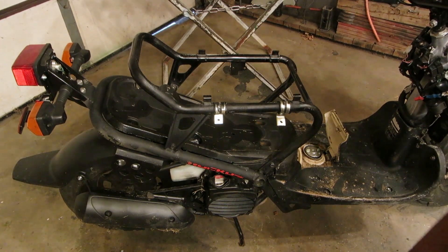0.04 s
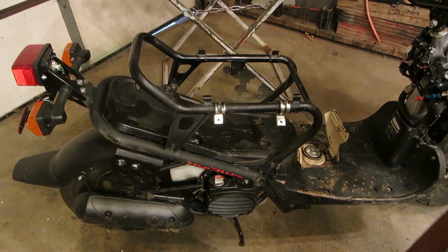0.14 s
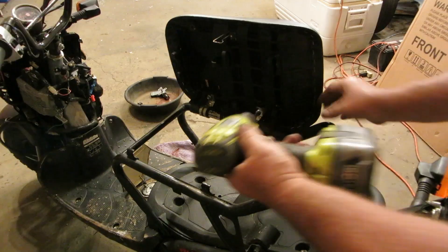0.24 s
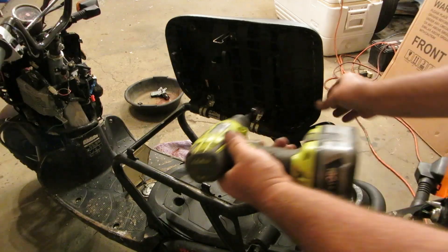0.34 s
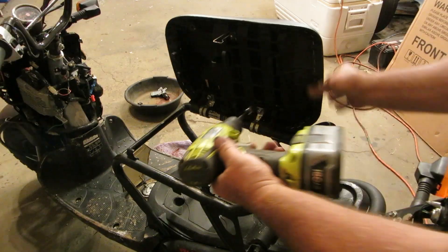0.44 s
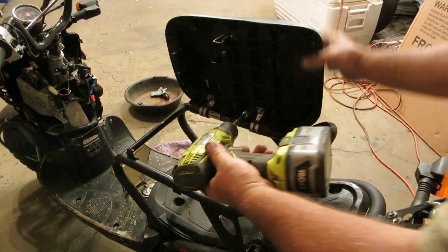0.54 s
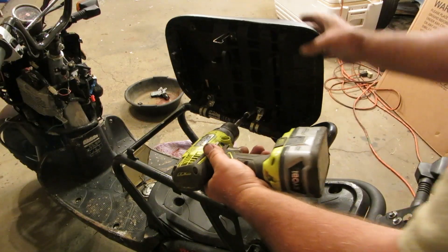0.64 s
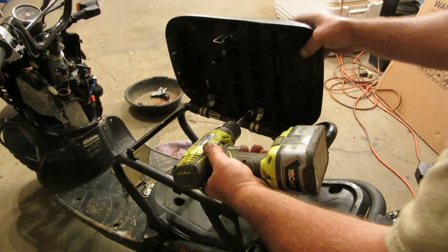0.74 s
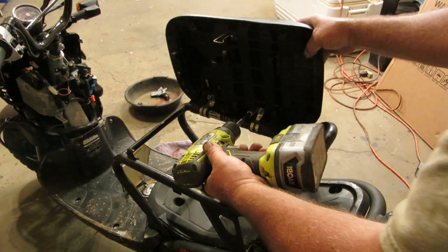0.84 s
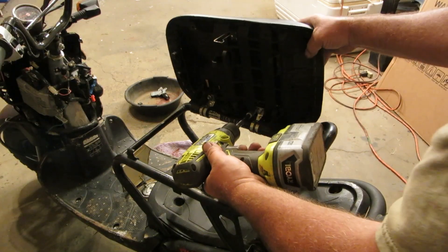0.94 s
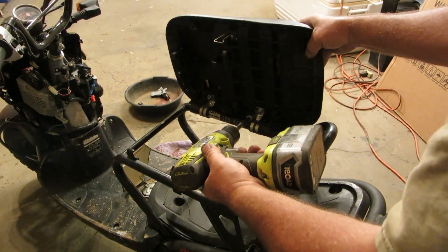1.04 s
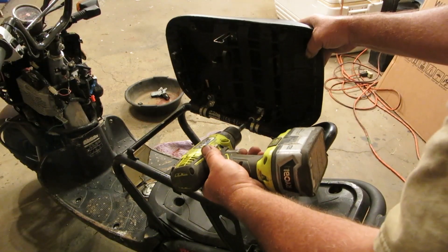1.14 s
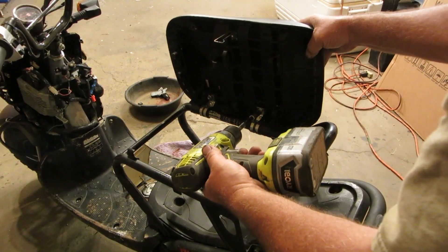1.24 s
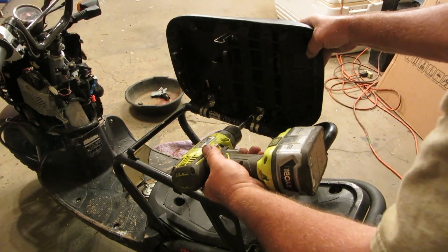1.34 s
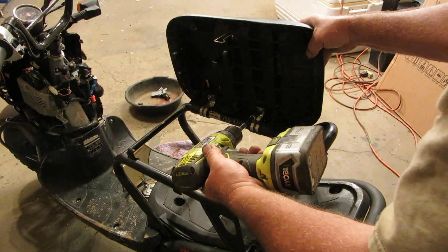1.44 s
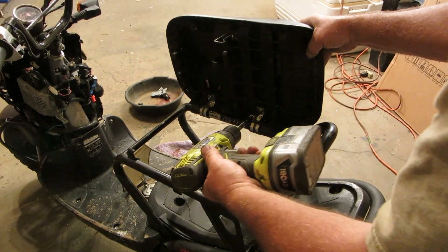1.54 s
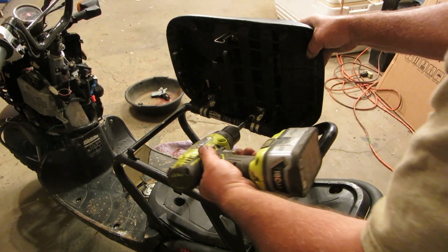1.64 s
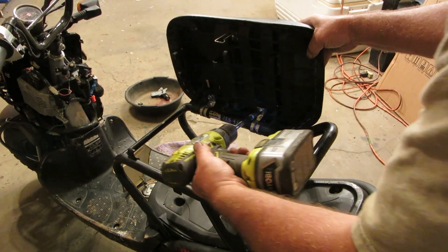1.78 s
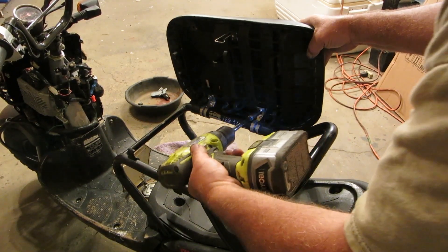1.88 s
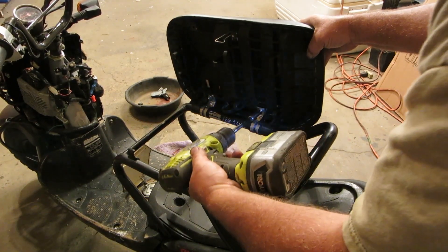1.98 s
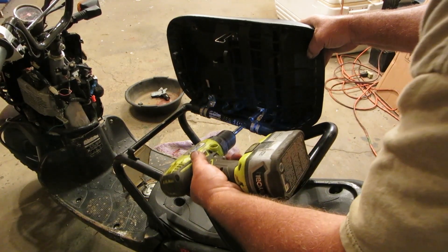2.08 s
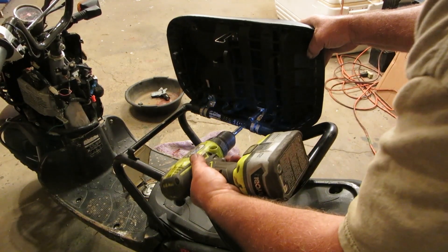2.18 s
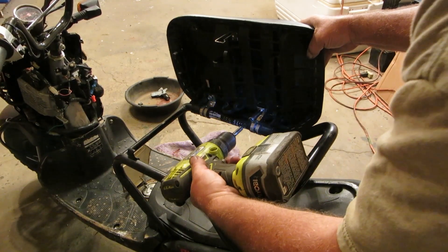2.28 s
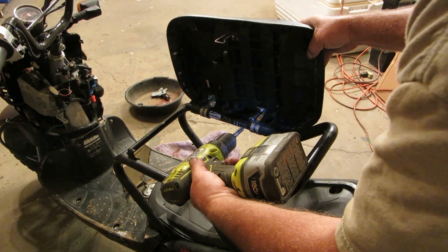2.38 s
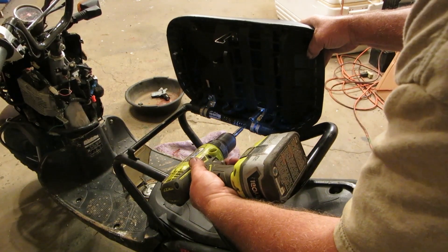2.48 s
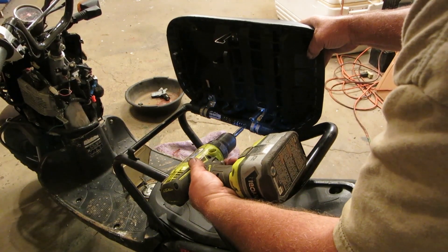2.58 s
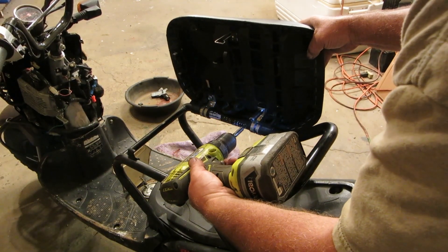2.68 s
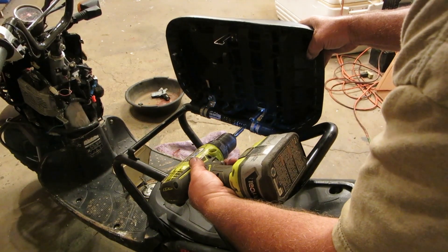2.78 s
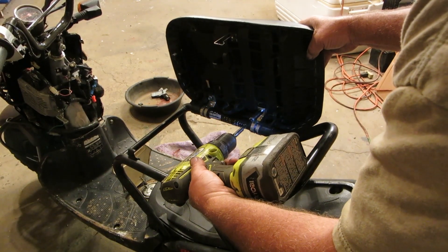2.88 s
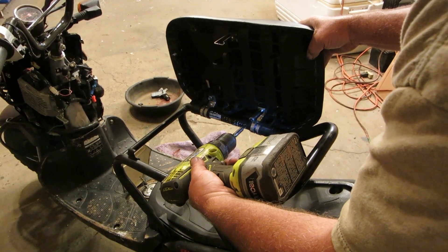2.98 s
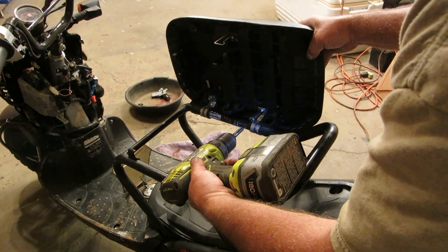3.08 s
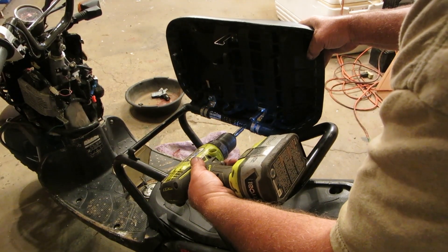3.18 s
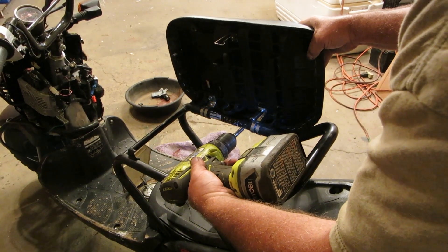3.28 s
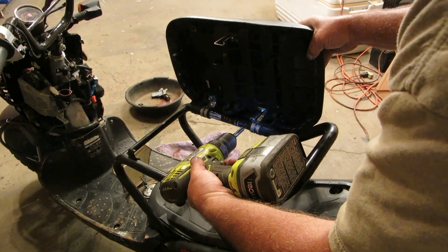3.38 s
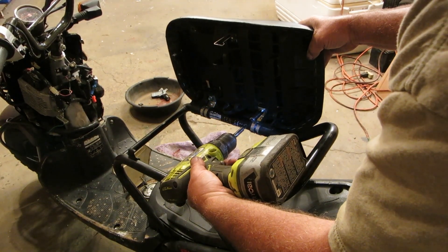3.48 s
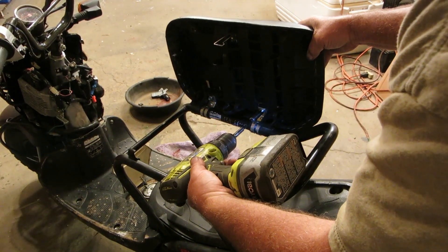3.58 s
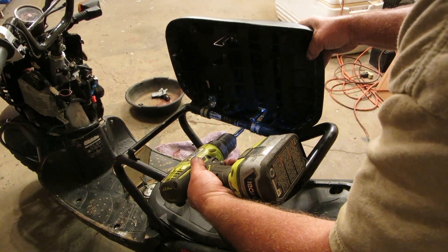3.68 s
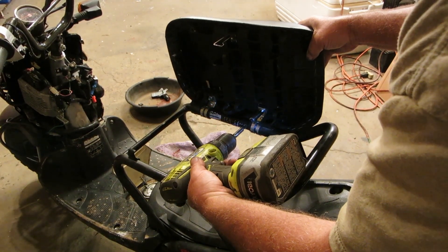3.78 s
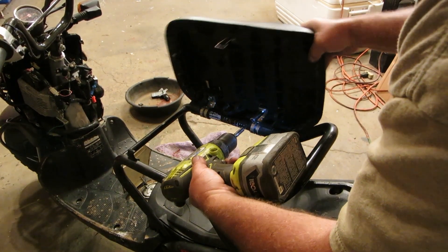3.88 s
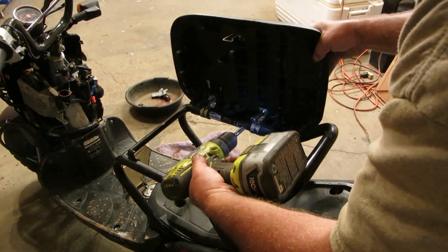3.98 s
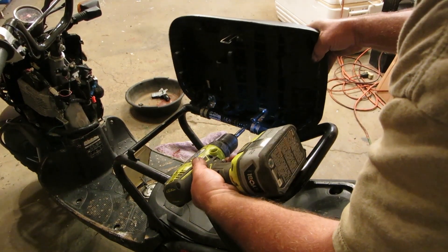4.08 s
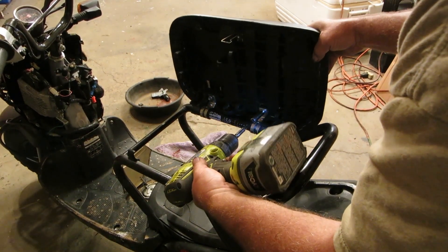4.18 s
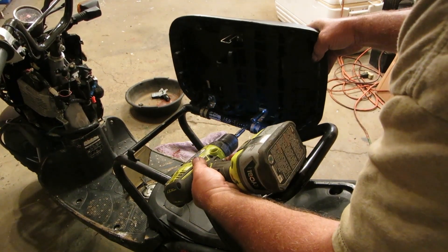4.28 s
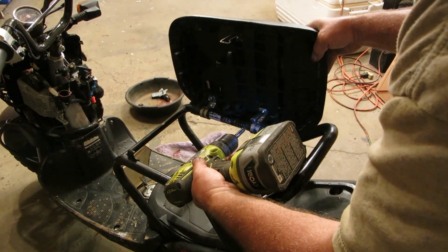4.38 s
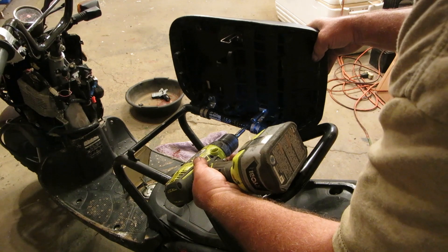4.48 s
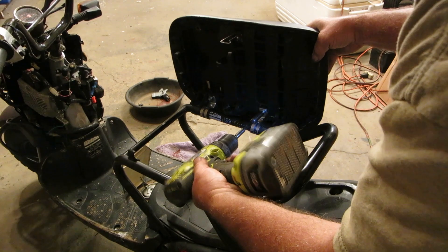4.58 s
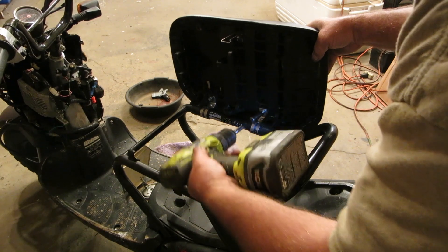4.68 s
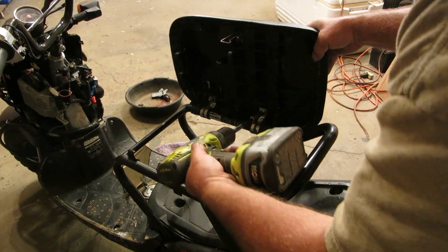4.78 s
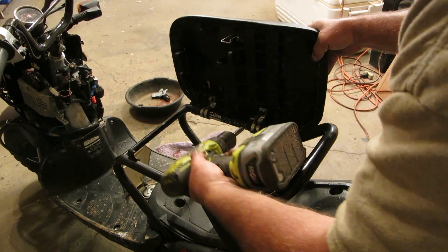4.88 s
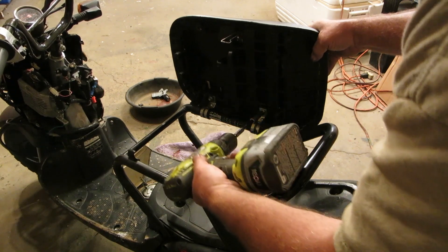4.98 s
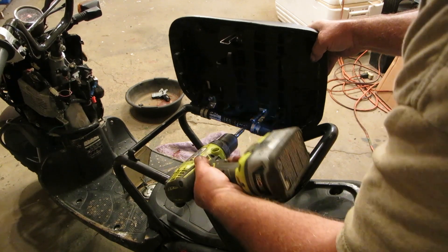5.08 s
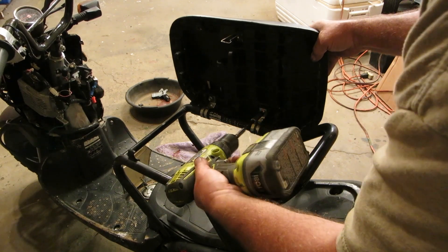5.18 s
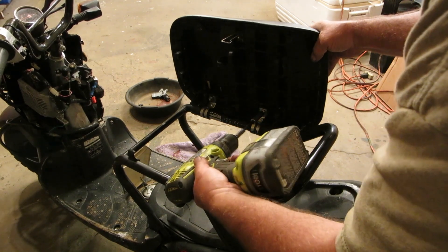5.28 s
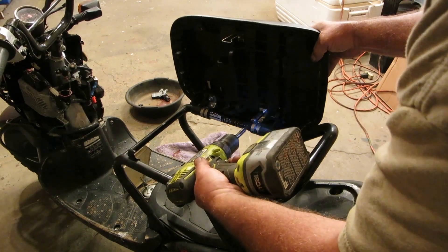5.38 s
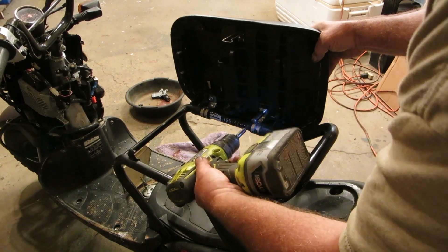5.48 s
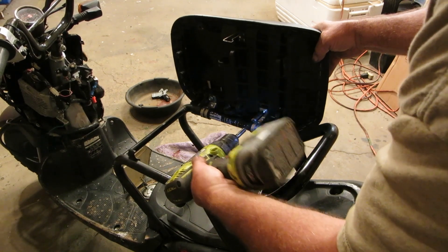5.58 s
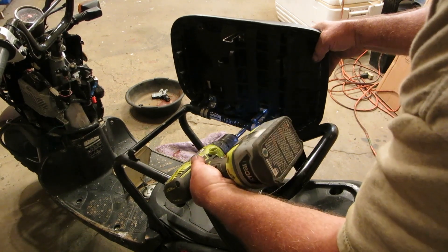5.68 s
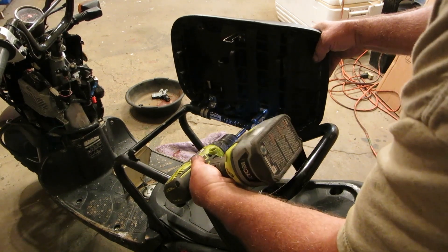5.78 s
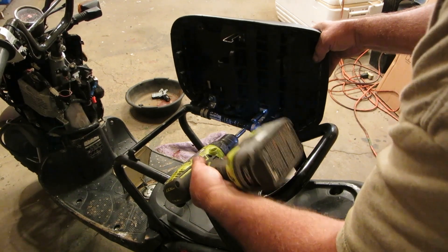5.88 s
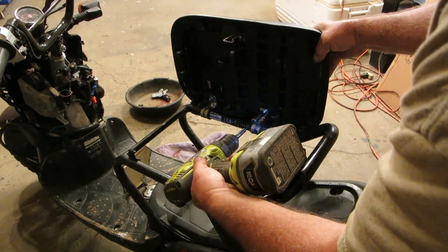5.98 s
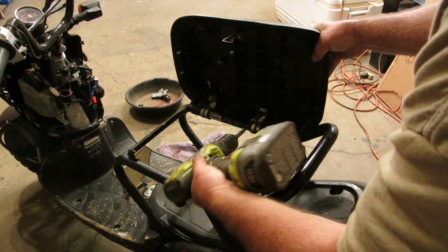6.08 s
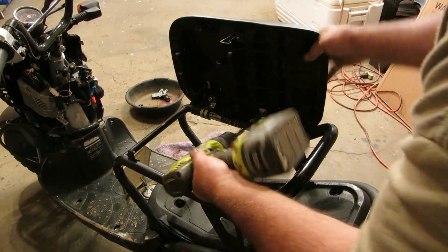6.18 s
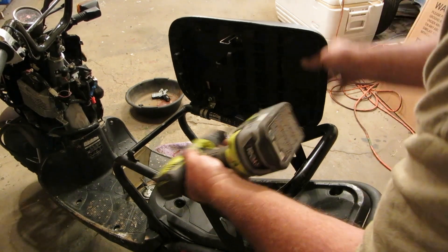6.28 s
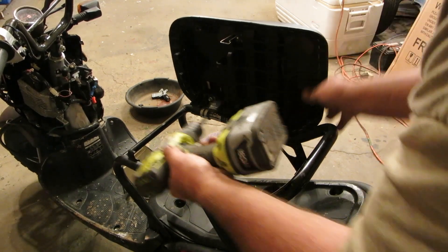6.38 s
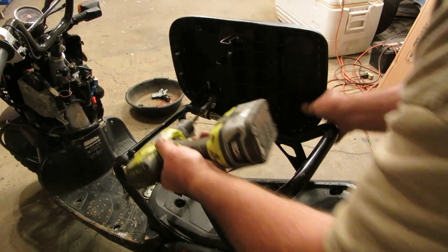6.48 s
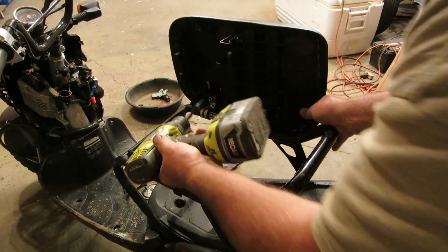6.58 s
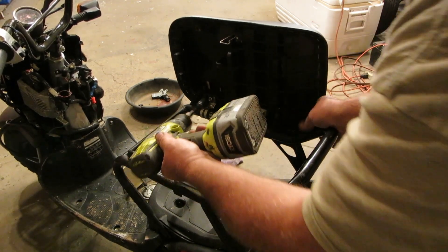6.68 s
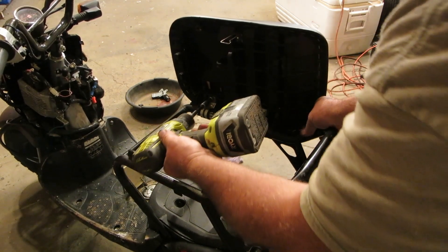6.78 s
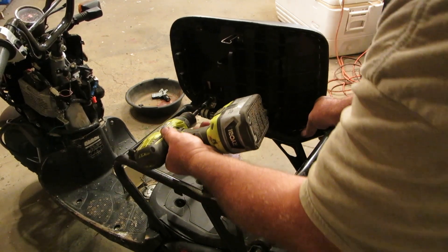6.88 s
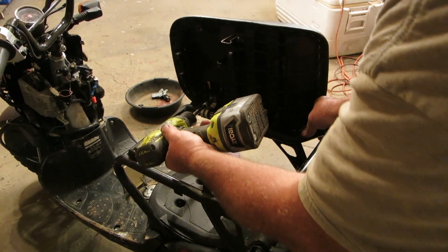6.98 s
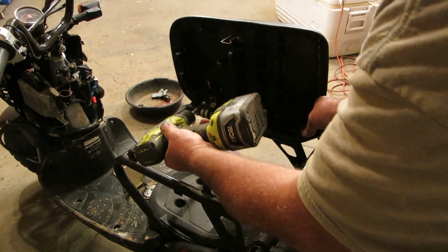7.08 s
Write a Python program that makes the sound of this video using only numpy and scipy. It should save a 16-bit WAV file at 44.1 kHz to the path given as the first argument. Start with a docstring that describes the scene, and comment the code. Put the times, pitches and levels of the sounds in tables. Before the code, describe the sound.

A cordless drill whines steadily and grinds slowly against a bolt, then slips in clattering bursts with hard metallic knocks in an echoing garage.

```python
"""A cordless drill-driver turns bolts slowly into a scooter's seat bracket in a garage.
Its half-pressed trigger makes steady tones whine; gears and bit grind as many tiny random impacts.
The bit catches and slips in clattering bursts, and every knock rings the seat pan and steel frame.
Later, hands brush the seat as filtered grains; fading random echoes make the garage, over quiet noise.
Near the start the sound cuts out briefly and returns with two pops and a fading room tail."""
import sys
import numpy as np
from scipy import signal
from scipy.fft import rfft, irfft
from scipy.io import wavfile

SR = 44100
rng = np.random.default_rng(int(sys.argv[2]) if len(sys.argv) > 2 else 0)


def log_audio(samples):
    """Write samples as a 16-bit WAV file to the path given in sys.argv[1]."""
    # one column per channel
    frames = np.atleast_2d(samples).T
    # limit to full scale, then quantise
    limited = np.clip(frames, -1, 1)
    pcm = np.round(limited * 32767).astype(np.int16)
    wavfile.write(sys.argv[1], SR, pcm)


N = 314874
TIME = np.arange(N) / SR

# The bit slips and churns in the bolt head, levels before the final balance:
# start_s, hold_s, gear_noise_db, bright_scrape_db
SLIPS = [(3.92, 0.12, -35.5, -37.5), (4.1, 0.07, -49, -45.5), (4.635, 0.057, -34, -48),
         (4.8, 0.085, -31, -35), (5.15, .07, -27, -32), (5.263, 0.022, -34, -53), (5.3, 0.059, -40, -56),
         (5.485, 0.088, -37.5, -41.5), (5.775, 0.023, -45.5, -46), (6.112, 0.066, -41.5, -43)]
SLIP_ATTACK_S, SLIP_RELEASE_S = 0.017, 0.024
# Broad tone of clattering metal, also of dull soft noise: pitch_hz, relative level_db (per Hz)
CLATTER_TONE = [(150, -20.5), (450, -4), (700, -0.5), (1200, -0.5), (2000, 1), (2800, -4), (4000, -21.5),
                (8000, -26)]
# Soft noises; the first row is a fading room tail, heard as the sound returns, the later rows are
# hands brushing the seat: start_s, hold_s, attack_s, relative bright_db, relative dull_db
SOFT_NOISES = [(0.227, .04, 0.0036, -56.5, -53), (6.36, 0.16, .05, -49.5, -71),
               (6.854, .005, 0.0065, -76, -47)]


def amp(db):
    """Turns decibels into a gain."""
    return 10 ** (np.asarray(db) / 20)


def unit(x):
    """Scales a sound to an average strength (rms) of 1."""
    return x / np.sqrt(np.mean(x ** 2) + 1e-20)


def read(points, hz):
    """Reads a table of (pitch_hz, value) in between its points, on a log pitch axis."""
    table_hz, value = np.transpose(points)
    return np.interp(np.log(hz + 1), np.log(table_hz + 1), value)


def add(mix, start_s, sound):
    """Mixes a sound in at a given time."""
    part = mix[round(start_s * SR):][:len(sound)]
    part += sound[:len(part)]


def drift(hz):
    """Slow random wander of rms 1: noise with everything much faster than hz removed."""
    spectrum = rfft(rng.standard_normal(N))
    slowness = 1 + (np.fft.rfftfreq(N, 1 / SR) / hz) ** 4
    return unit(irfft(spectrum / slowness, N))


def colour(x, points, modes=()):
    """Filter of energy 1 that never sounds early: a broad spectrum with resonances on top."""
    hz = np.fft.rfftfreq(4096, 1 / SR)
    peaks = sum(db / (1 + (2 * (hz - peak_hz) / width_hz) ** 2) for peak_hz, width_hz, db in modes)
    level_db = read(points, hz) + peaks
    log_gain = np.log(amp(np.r_[level_db, level_db[-2:0:-1]]))
    # this phase puts the filter's energy as early as possible
    taps = np.fft.ifft(np.exp(np.conj(signal.hilbert(log_gain)))).real
    return signal.oaconvolve(x, taps / np.linalg.norm(taps))[:len(x)]


def grains(per_s, spread_db):
    """A random train of tiny impacts of uneven size, scaled to rms 1."""
    size = amp(spread_db * np.minimum(rng.exponential(1, N), 4))
    direction = rng.choice([-1, 1], N)
    hits = rng.random(N) < per_s / SR
    return unit(size * direction * hits)


def ring(x, hz, width_hz):
    """One resonance, scaled to pass white noise at its own power."""
    radius = np.exp(-np.pi * width_hz / SR)
    spin = radius * np.exp(2j * np.pi * hz / SR)
    return np.sqrt(2 * (1 - radius * radius)) * signal.lfilter([1], [1, -spin], x).imag


def swell(start_s, hold_s, attack_s, release_s):
    """Gain that grows up to the start, holds, then dies away (exponential time constants)."""
    growth = np.minimum(TIME - start_s, 0) / attack_s
    decay = np.maximum(TIME - start_s - hold_s, 0) / release_s
    return np.exp(growth - decay)


def glide(rows, waver):
    """Phase and gain of a slightly unsteady tone that follows a curve of pitch and level."""
    s, hz, db = np.transpose(rows)
    pitch = np.interp(TIME, s, hz) * (1 + waver * drift(130))
    phase = 2 * np.pi * np.cumsum(pitch) / SR
    sounding = (TIME > s[0]) * (TIME < s[-1])
    return phase, amp(np.interp(TIME, s, db)) * sounding


def soft_noise(rows, release_s=0.038):
    """Bright and dull noise from many tiny impacts, each row swelling and fading once."""
    # tone of the bright part: pitch_hz, relative level_db (per Hz)
    bright_tone = [(300, -42), (800, 4), (1750, -1), (3000, 4), (5500, 5.5), (9500, 1.5), (15000, -6)]
    bright = colour(grains(7100, 1.4), bright_tone)
    dull = colour(grains(3000, 0.97), CLATTER_TONE)
    out = np.zeros(N)
    for start, hold, attack, bright_db, dull_db in rows:
        out += swell(start, hold, attack, release_s) * (amp(bright_db) * bright + amp(dull_db) * dull)
    return out


def floor(air_db=-47):
    """Still garage air as shaped noise, with faint steady electrical tones."""
    # spectrum of the air: pitch_hz, relative level_db (per Hz)
    air_tone = [(12, -50), (20, -2), (81, -3), (146, -2.5), (210, -5), (340, -4), (513, -4.5), (1220, -3),
                (1600, -8), (3530, -13.5), (8180, -21), (13500, -28), (16000, -49)]
    # how alike left and right are: pitch_hz, correlation (-1 to 1)
    likeness = [(30, -0.28), (70, -0.14), (150, -0.71), (400, -0.83), (1500, -0.81), (5000, -0.65),
                (14000, 1)]
    # electrical tones: pitch_hz, level_db (rms)
    hum = [(1147, -73.5), (1723, -77.5), (15735, -72.5)]
    hz = np.fft.rfftfreq(N, 1 / SR)
    left, other = rfft(rng.standard_normal((2, N)))
    same = np.clip(read(likeness, hz), -1, 1)
    right = same * left + np.sqrt(1 - same ** 2) * other
    air = irfft(np.array([left, right]) * amp(read(air_tone, hz)), N)
    tones = sum(amp(db) * np.sqrt(2) * np.sin(2 * np.pi * f * TIME) for f, db in hum)
    return amp(air_db) * unit(air) + tones


def room_tail():
    """A fading room tail, heard as the sound returns, made of soft noise."""
    return soft_noise(SOFT_NOISES[:1])


def garage(x, width=0.41, onset_s=0.00057):
    """Dense reflections die away band by band, with nearly the same tail left and right."""
    # time to fade by 60 dB: pitch_hz, fade_s
    fade_times = [(150, 1), (500, 0.49), (1400, 0.48), (3700, 0.5), (8000, 0.45), (15000, 0.37)]
    echoes = rng.standard_normal((2, SR)) * (rng.random((2, SR)) < .12)
    hz, t, bands = signal.stft(echoes, SR, nperseg=256)
    fade = amp(-60 * t / read(fade_times, hz)[:, None])
    bands = bands * fade * (1 - np.exp(-t / onset_s))
    tails = signal.istft(bands, SR, nperseg=256)[1]
    mid, side = signal.fftconvolve(x[None], tails / np.linalg.norm(tails[0]), axes=1)[:, :N]
    return np.array([mid + width * side, mid - width * side])


def whistles():
    """A thin two-toned squeal as the drill is brought up, then its faint gliding whistle."""
    # both tables: time_s, pitch_hz, relative level_db
    squeal_curve = [(.27, 9600, -73), (.39, 9200, -72), (.46, 8400, -67), (.58, 8700, -66),
                    (.77, 7600, -74)]
    whistle_curve = [(1.83, 7320, -56), (1.95, 7310, -58), (2.2, 7470, -55), (2.55, 7300, -56),
                     (2.78, 7210, -51), (3.5, 7060, -64)]
    phase, gain = glide(whistle_curve, 0.0018)
    whistle = gain * np.sin(phase) * amp(5.1 * drift(25))
    phase, gain = glide(squeal_curve, .004)
    squeal = gain * (np.sin(phase) + np.sin(1.087 * phase))
    return np.sqrt(2) * (whistle + squeal)


def knocks(blows, clatter_t60=0.09, tick_t60=0.039, thud_t60=0.16, thud_db=-1, thump_db=-2,
           clatter_db=1, tick_db=2, ring_db=6, ring_share=0.41):
    """Each blow is a hard crack, a dense ring of the frame and a slower boom; returns (bright part, boom)."""
    # seat pan modes: pitch_hz, relative level_db, time to fade by 60 dB fade_s
    pan = [(143, -17, .35), (205, -14, .2), (228, -4, .28), (275, -15, .15), (335, -6, .2), (380, -8, .13),
           (430, -3, .15), (452, 0, .17), (480, -4, .14), (670, -11, .12), (740, -8, .13), (810, -8, .13)]
    # steel frame resonances: pitch_hz, width_hz, boost_db
    frame_modes = [(690, 150, -1.5), (984, 21, 3), (1190, 220, 1), (1346, 130, 2.5), (1680, 47, 0.5),
                   (2210, 100, 1.5), (2770, 90, -9), (3700, 160, 8)]
    # tones of thud (the pan's many damped modes), tick and crack: pitch_hz, relative level_db (per Hz)
    thud_tone = [(90, -42), (145, -12), (175, -13), (228, 0), (275, -7), (340, -2), (450, -1), (600, -8),
                 (780, -2), (1050, -4), (1500, -20), (3000, -50)]
    tick_tone = [(1200, -18.5), (2600, 1), (3600, 2.5), (5000, -0.5), (7000, -4.5), (9000, -12),
                 (12000, -18), (16000, -43)]
    crack_tone = [(100, -25.5), (500, 1), (1500, 9), (4000, -0.5), (7500, -5), (10000, -12.5), (16000, -76)]
    # hard, bright blows crack more sharply: base dB, dB per dB of strength, dB per dB of brightness
    crack_db, crack_growth, crack_bright_share = 20.5, 1.65, .35
    t = np.arange(SR // 2) / SR
    crack, thump, clatter, tick = np.zeros((4, N))
    hz, mode_db, t60 = np.array(pan).T[:, :, None]
    for start, strength, boom, bright, ring_hz in blows:
        noise = rng.standard_normal((4, len(t)))
        where = rng.standard_normal((2, len(pan), 1))
        # the place of the blow weights the modes and favours those near its main ring
        near = 8 / (1 + (4 * (hz / ring_hz - 1)) ** 2)
        weight = amp(mode_db + 1.5 * where[0] + near)
        phase = 2 * np.pi * hz * (1 + 0.0084 * where[1]) * t + np.pi * (where[1] > 0)
        modes = (weight * amp(-60 * t / t60) * np.sin(phase)).sum(0) / np.linalg.norm(weight)
        thud_noise = noise[3] * amp(-60 * t / thud_t60)
        thud = amp(thud_db) * colour(thud_noise, thud_tone, [(ring_hz, ring_hz / 4, 12)])
        soft_start = 1 - np.exp(-t / 0.0019)
        add(thump, start, amp(strength + boom + thump_db) * (modes + thud) * soft_start)

        main_ring = (ring_hz, ring_share * ring_hz, ring_db)
        frame = colour(noise[0] * amp(-60 * t / clatter_t60), CLATTER_TONE, frame_modes + [main_ring])
        add(clatter, start, amp(strength + clatter_db) * frame)
        add(tick, start, amp(strength + bright + tick_db) * noise[1] * amp(-60 * t / tick_t60))

        contact = t / .0003 * np.exp(-t / .0003)  # very short press of metal on metal
        snap = colour(noise[2] * contact, crack_tone)
        snap_db = crack_db + crack_growth * strength + crack_bright_share * bright
        add(crack, start, amp(snap_db) * snap / abs(snap).max())
    return crack + clatter + colour(tick, tick_tone), thump


def effort(scrape_start_db=1.5, dulls_db_per_s=4):
    """Gains of gear noise and bright scrape: a long run whose scrape smooths out, then the slips."""
    # how hard the bit grinds in the long, slow run, before the final balance: time_s, level_db
    drive = [(1.84, -54), (1.88, -45.5), (1.93, -47), (2.03, -36), (2.4, -34.5), (2.85, -35.5),
             (3.48, -37.5), (3.75, -44), (3.91, -39.5)]
    s, db = np.transpose(drive)
    gear = amp(np.interp(TIME, s, db)) * swell(s[0], s[-1] - s[0], SLIP_ATTACK_S, SLIP_RELEASE_S)
    # the scrape weakens against the gear noise as the bolt goes in
    scrape = gear * amp(scrape_start_db - dulls_db_per_s * (TIME - s[0]))
    for start, hold, gear_db, scrape_db in SLIPS:
        shape = swell(start, hold, SLIP_ATTACK_S, SLIP_RELEASE_S)
        gear = np.maximum(gear, amp(gear_db) * shape)
        scrape = np.maximum(scrape, amp(scrape_db) * shape)
    return gear, scrape


def grind(chatter_db=1.37, shift_db=3.5, gear_db=-2, scrape_db=-3.5):
    """Gear teeth and the bit rub in dense small impacts under a chattering pressure."""
    # tones of gears and scrape: pitch_hz, relative level_db (per Hz)
    gear_tone = [(90, -57), (170, -21), (300, -7), (450, -5), (550, -6.5), (680, 0.5), (1100, 0),
                 (2000, 1.5), (2800, -1.5), (3200, -6.5), (4000, -8), (6400, -21.5), (9000, -43)]
    scrape_tone = [(1500, -20), (3000, -3.5), (3700, -0.5), (4700, -3), (6000, -4.5), (7800, -7),
                   (10000, -10.5), (13000, -21.5), (16000, -28)]
    # ringing of socket and gearbox: pitch_hz, width_hz, level_db against the gear noise
    socket = [(1170, 110, -14), (1600, 140, -15), (2070, 190, -13), (2650, 200, -11), (3610, 260, -13),
              (5190, 110, -20)]
    gear_gain, scrape_gain = effort()
    pressure = amp(chatter_db * drift(126))
    gears = colour(grains(5000, 2.1), gear_tone)
    for hz, width, db in socket:
        # as the contact point wanders, now one resonance and now another stands out
        singing = ring(grains(5000, 2.9), hz, width) * amp(shift_db * drift(3.1))
        gears += amp(db) * unit(singing)
    gears = gears * gear_gain
    scrape = colour(grains(3500, 0.75), scrape_tone) * scrape_gain
    return pressure * (amp(gear_db) * gears + amp(scrape_db) * scrape)


def whine(waver=.00077, wander_hz=10, flutter_db=2):
    """The trigger chops the motor current; the windings sing at that rate and its octave."""
    # trigger pulls: start_s, stop_s, switching pitch_hz, relative tone_db, relative octave_db
    pulls = [(1.935, 4.8, 6905, -46, -51.5), (5.11, 5.235, 6880, -45, -47), (5.46, 5.715, 6930, -53, -53),
             (5.712, 5.785, 6880, -48, -54), (5.775, 6.105, 6835, -41.5, -52)]
    # the whine starts flat, climbs to its pitch, and sags as the trigger is let go
    climb_hz, climb_s, sag_hz, sag_s = 600, .016, 850, .018
    attack_s, release_s = 0.0096, 0.013
    out = np.zeros(N)
    unsteady, wander = 1 + waver * drift(90), wander_hz * drift(1.5)
    flutter = [amp(flutter_db * drift(40) - 1) for _ in range(2)]
    for start, stop, hz, *levels in pulls:
        length = stop - start
        t = np.arange(0, length, 1 / SR)
        pitch = hz - climb_hz * np.exp(-t / climb_s) - sag_hz * np.exp((t - length) / sag_s)
        phase = 2 * np.pi * np.cumsum(pitch * unsteady[:len(t)] + wander[:len(t)]) / SR
        held = np.minimum(t / attack_s, 1) * np.minimum((length - t) / release_s, 1)
        for k, db in enumerate(levels):
            tone = np.sin((k + 1) * phase)
            add(out, start, amp(db) * held * flutter[k][:len(t)] * tone)
    return np.sqrt(2) * out


def rattles(count=12, per_s=49, level_db=-1, spread_db=3.5, boom_db=-6, bright_db=-2.5):
    """A slipping bit skips from corner to corner of the bolt head: small, unevenly spaced knocks."""
    # range of their main ring: lowest_hz, highest_hz
    low_hz, high_hz = (694, 3480)
    rows = []
    for start, hold, gear_db, _ in SLIPS:
        for k, (late, size, place) in enumerate(rng.random((count, 3))):
            after = (k + late) / per_s
            if after < hold:
                strength = gear_db + level_db + spread_db * (2 * size - 1)
                ring_hz = low_hz * (high_hz / low_hz) ** place
                rows.append((start + after, strength, boom_db, bright_db, ring_hz))
    return rows


def brushing():
    """Hands brush over the seat, heard as swells of soft noise."""
    return soft_noise(SOFT_NOISES[1:])


def scene():
    """Drill, hands and knocks close by, with the garage's echoes and still air."""
    # knocks of bit, bolt and seat, before the final balance: start_s, strength_db,
    # seat pan boom_db and metal brightness_db (both against the strength), main ring_hz
    blow_list = [(.662, -39, -1, -3, 1400), (.866, -35.5, -15, 5, 3140), (1.004, -49, -22, 4.5, 2140),
                 (1.077, -49, -1, -1, 2100), (1.4451, -27, -3, -6, 2450), (1.549, -39.5, 1.5, 2.5, 320),
                 (1.589, -53, 14, -8, 450), (1.672, -48.5, 13.5, 1, 456), (1.735, -46.5, -8, -5, 2100),
                 (1.783, -45.5, -9, -2, 1500), (1.877, -43.5, 2, 6.5, 2400), (2.285, -32.5, 8.5, -10, 514),
                 (2.384, -34, 5.5, -7, 467), (2.44, -43, 13, 7.5, 464), (2.884, -39, 10.5, 3, 417),
                 (3.908, -19, -4, -15, 940), (3.936, -27.5, 6.5, -1, 470), (3.947, -33, 4.5, 3, 252),
                 (3.967, -28.5, 4, 0, 696), (4.115, -39, 7.5, -12, 225), (4.139, -43.5, 11, -7, 223),
                 (4.417, -38.5, -1.5, 0, 1560), (4.623, -26.5, -15, 1, 2080), (4.635, -24.5, -7, 3.5, 3600),
                 (4.6645, -17, 2, 2.5, 750), (4.679, -31, 14.5, -7, 463), (4.708, -27, 4.5, -1, 1010),
                 (4.771, -33, 3, 6, 2120), (4.7925, -25.5, -32, 4, 2720), (4.814, -24, -4, 2, 2200),
                 (4.852, -27.5, -18.5, 8, 3620), (5.16, -19.5, 1.5, 3.5, 1220),
                 (5.186, -19, -9, -1.5, 1999), (5.2429, -17.5, -11.5, -5.5, 1518),
                 (5.493, -28.5, -4.5, -20, 1830), (5.535, -18, -12, -4, 1877),
                 (6.116, -27.5, -22, -5.5, 1541), (6.143, -41, -23, 5, 1150), (6.234, -26, -27, 3, 2804),
                 (7.09, -29.5, -7.5, -9.5, 1424), (7.136, -33, -6, 10.5, 750)]
    air = floor()
    noises = room_tail() + grind() + brushing()
    tone = whine() + whistles()
    blows, boom = knocks(blow_list + rattles())
    # boom and tones feed the echoes least
    room = garage(amp(-3.0) * blows + amp(-6.0) * noises + amp(-10) * (boom + tone))
    close = blows + boom + noises + tone
    return (close + room) * amp([[-.3], [.3]]) + air  # the right side is slightly louder


def record(dry):
    """The sound cuts out briefly and returns with pops; then loud peaks and the top treble are cut."""
    # the silent gap: start_s, stop_s
    gap = (.083, .219)
    # pops around the return: time_s, height before the treble cut (full scale = 1)
    pop_list = [(0.2208, 0.064), (0.2233, 0.15)]
    out = dry * ((TIME < gap[0]) | (TIME > gap[1]))
    pops = np.zeros(N)
    for start, height in pop_list:
        add(pops, start, height * np.exp(-np.arange(64) / 4))
    treble_cut = signal.firwin(511, 16300, window=("kaiser", 9), fs=SR)  # passes below 16300 Hz
    return signal.oaconvolve(np.clip(out + pops, -1, 1), treble_cut[None], "same", axes=1)


dry = scene()
out = record(dry)
log_audio(out)
```